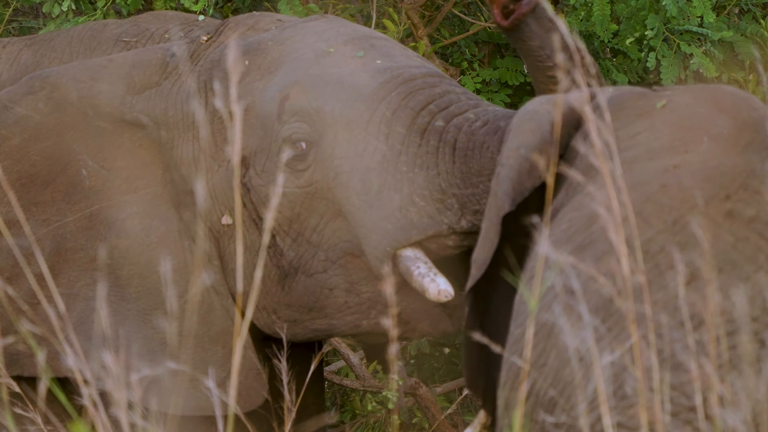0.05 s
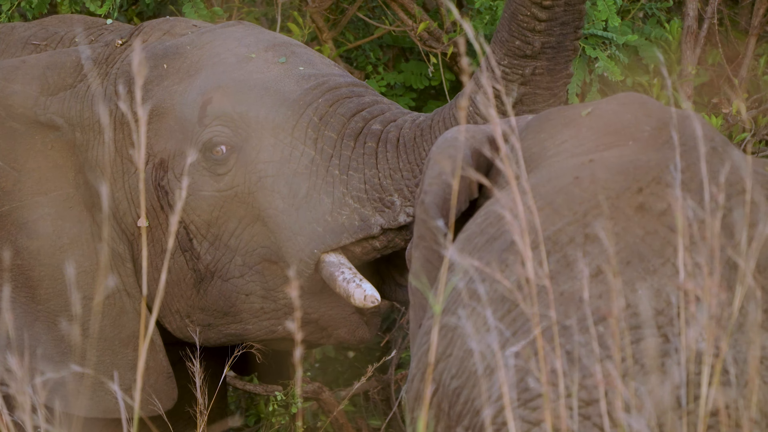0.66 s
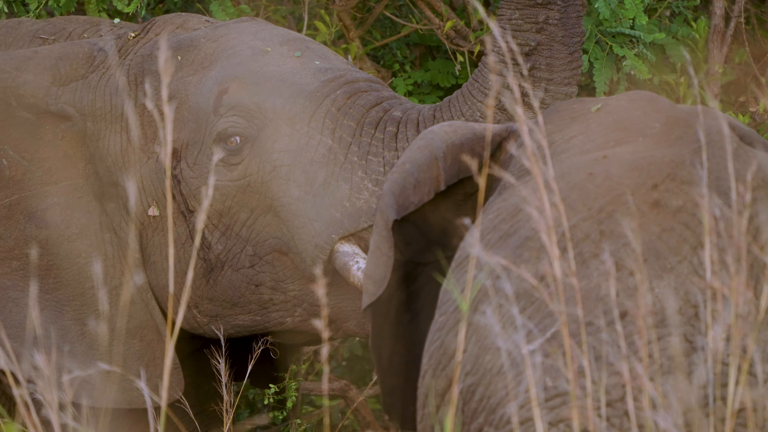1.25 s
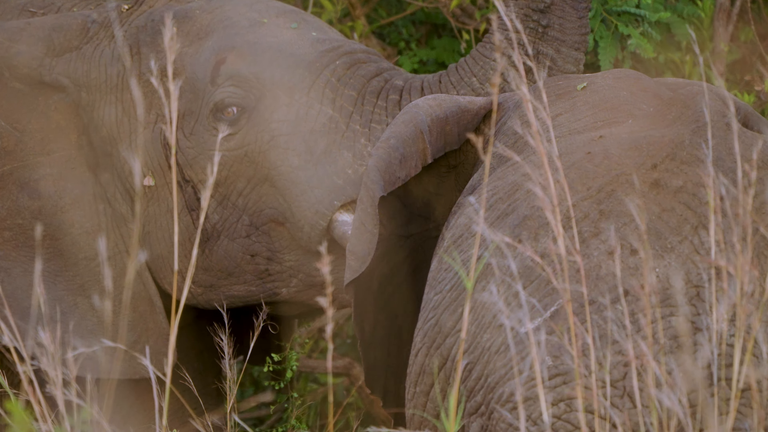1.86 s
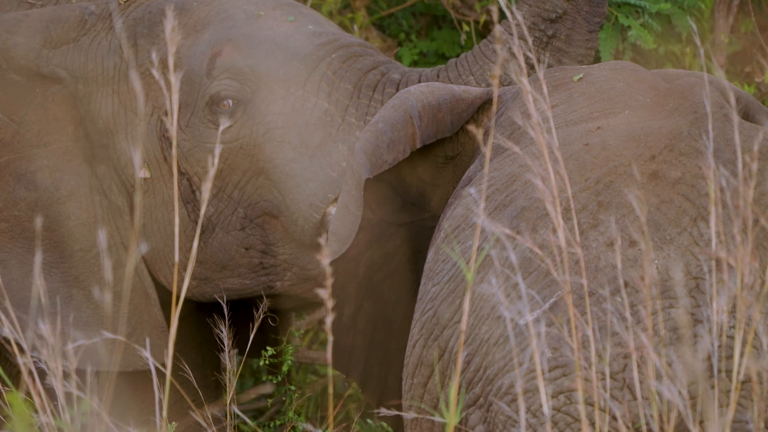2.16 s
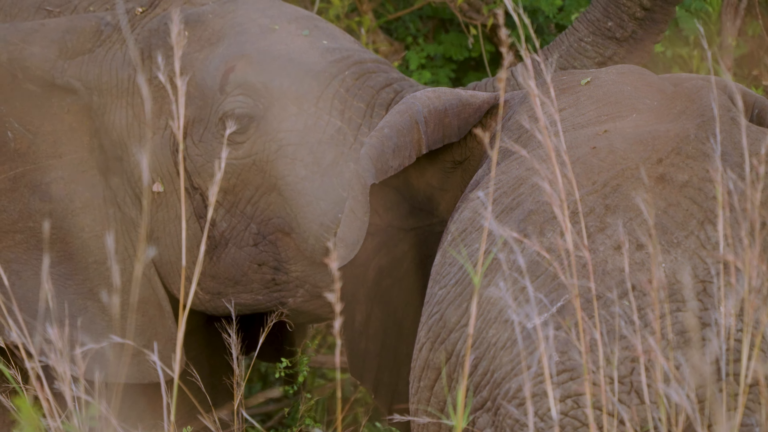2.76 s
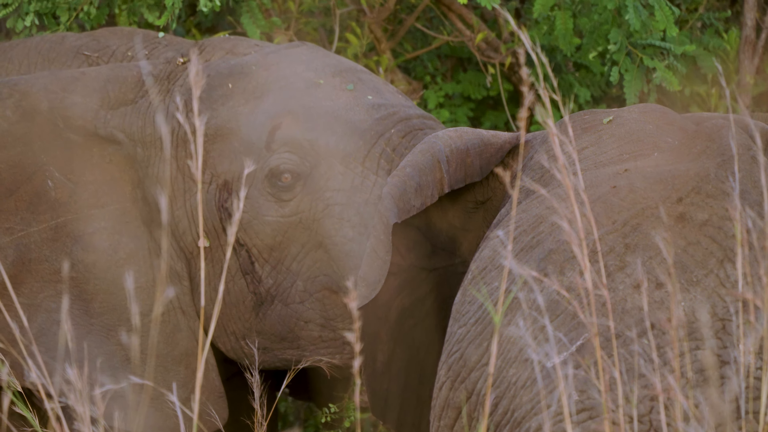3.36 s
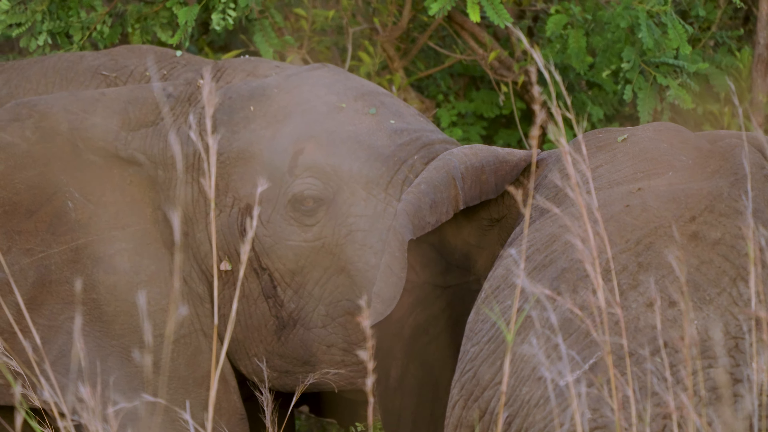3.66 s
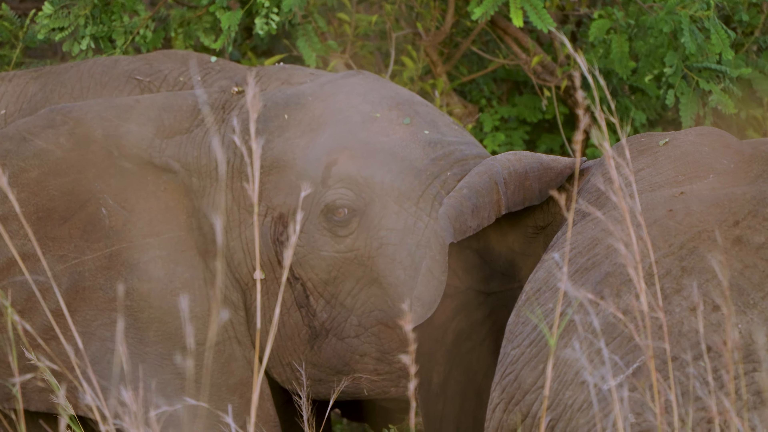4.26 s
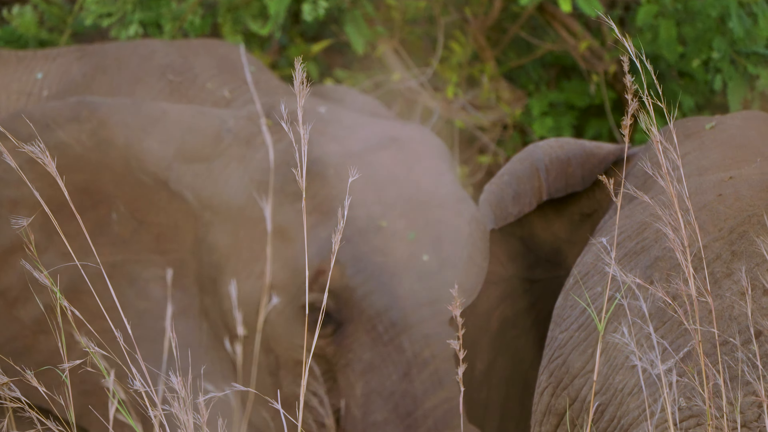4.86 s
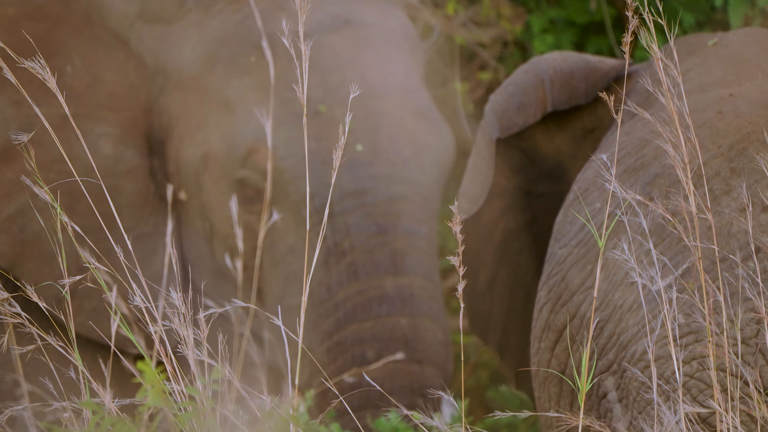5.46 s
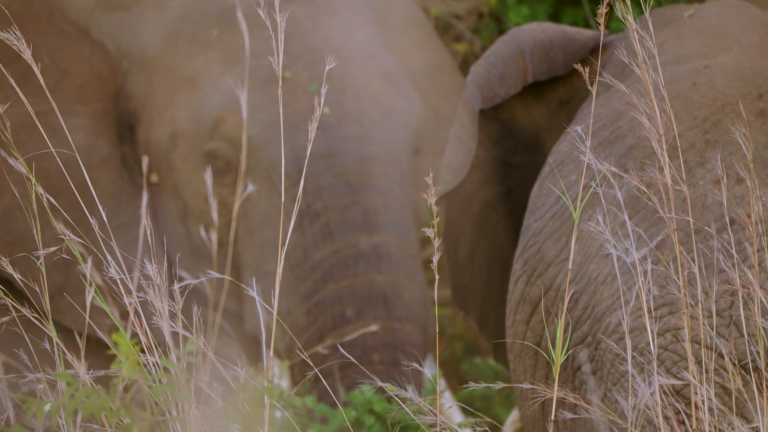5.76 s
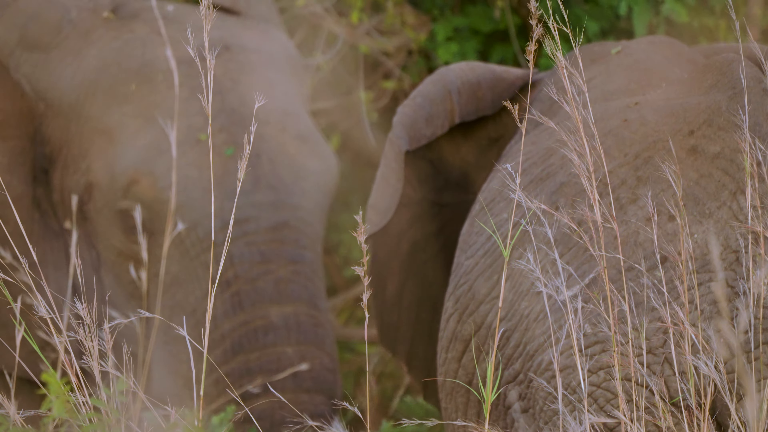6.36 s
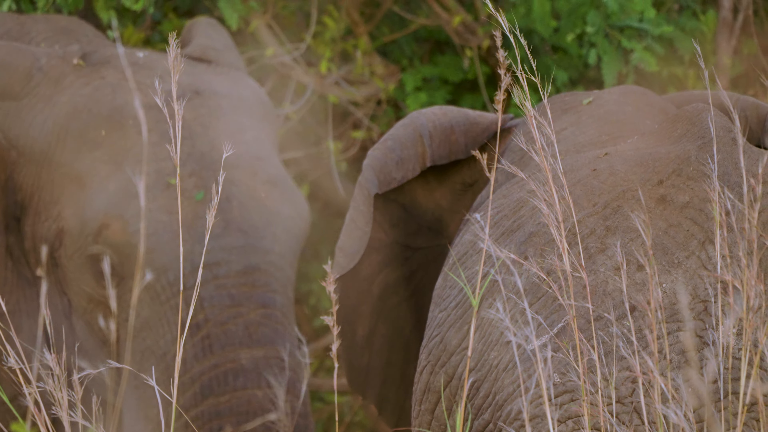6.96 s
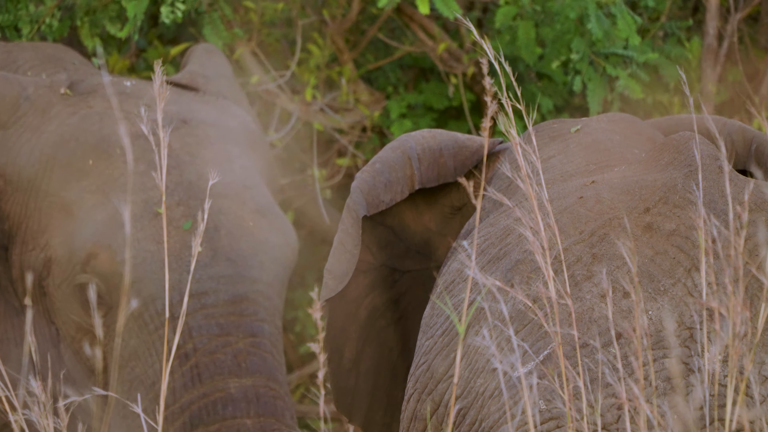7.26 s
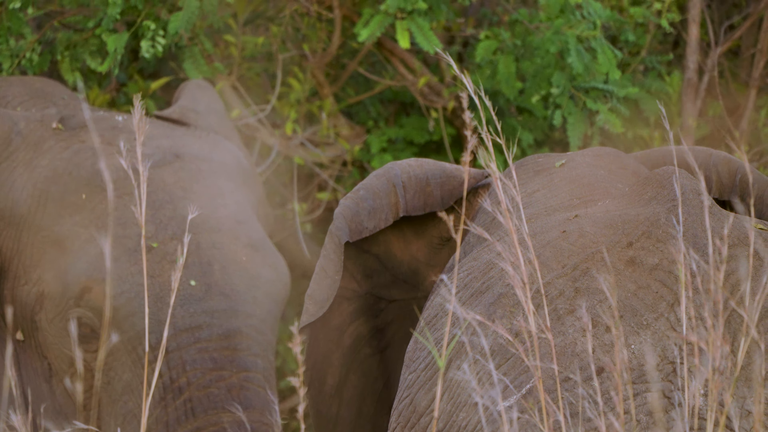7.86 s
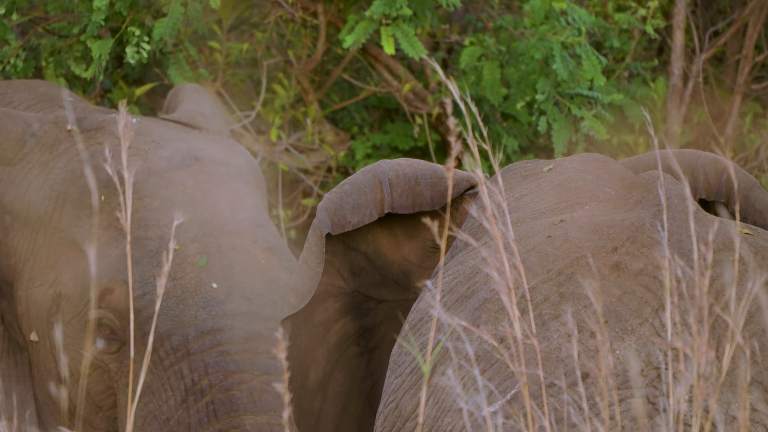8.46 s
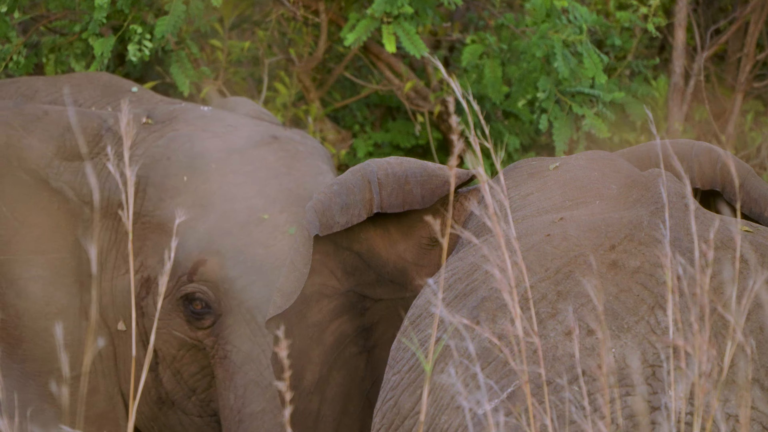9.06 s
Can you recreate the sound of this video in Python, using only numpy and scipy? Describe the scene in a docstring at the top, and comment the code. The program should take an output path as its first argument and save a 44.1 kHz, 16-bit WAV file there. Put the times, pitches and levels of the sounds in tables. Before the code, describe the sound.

Outdoors in the bush, a steady low hum and soft hiss run under faint birdsong. Tall grass rustles lightly and dry stems snap around elephants. A camera control is pressed and released three times in the first half, with sharp ticks and low thumps right at the microphone. A bird chatters, then turns to whistles, joined by two warbles. At the very end an elephant breaks into a loud, harsh roar, cut off almost at once.

```python
"""Tall grass rustles and dry stems snap around elephants, while birds sing in the bush behind them.
A control on a camera is pressed and let go three times, with sharp ticks and low thumps of the casing.
A low hum, probably the camera's own, runs throughout over soft outdoor air and hiss.
At the very end an elephant breaks into a roar: slow, harsh pulses that ring its throat."""
import sys
import numpy as np
from scipy import signal
from scipy.fft import rfft, irfft, next_fast_len
from scipy.io import wavfile
from scipy.ndimage import uniform_filter1d

SR = 44100
rng = np.random.default_rng(int(sys.argv[2]) if len(sys.argv) > 2 else 0)


def to_wav(sig):
    """Store sig (one row per channel, or 1-D mono) as 16-bit WAV at the path in sys.argv[1].

    Samples outside -1..1 are clipped; the rate is SR.
    """
    pcm = np.clip(np.atleast_2d(sig), -1, 1) * 32767
    pcm = np.round(pcm).astype(np.int16)
    wavfile.write(sys.argv[1], SR, pcm.T)  # frames by channels


N = 401751
TIME = np.arange(N) / SR
TOP_HZ = 15800
BUSH_FADE_S = .45  # a "fade" is the time a sound takes to drop by 60 dB

# The pitches the throat rings at (more damping, shorter ring): pitch_hz, damping_hz, level_db
THROAT_RINGS = [(450, 60, -8), (560, 85, -4), (680, 110, -13), (1000, 110, -21), (1350, 55, -32),
                (1770, 65, -30), (3400, 250, -38), (3950, 110, -32)]
# The roar's effort gathers, then surges: time_s, level_db
ROAR_EFFORT = [(9.036, -21.5), (9.099, -12), (9.107, -4.5)]


def elephant(start_s=9.036, rate_hz=62, rise_hz_per_s=223, weak_db=-5, rasp_db=-22, slap_s=.00073):
    """Heavy vocal folds slap open ever faster; each slap rings the throat and air rasps through it."""
    elapsed = np.maximum(TIME - start_s, 0)
    slap_count = np.ceil(rate_hz * elapsed + rise_hz_per_s * elapsed ** 2 / 2)
    effort_db = np.interp(TIME, *np.transpose(ROAR_EFFORT))
    effort = undb(effort_db + weak_db * (slap_count % 2))  # weak and strong by turns
    t = np.arange(SR // 20) / SR
    push = np.sin(np.pi * np.minimum(t / slap_s, 1)) ** 2  # soft flesh gives a rounded push
    slaps = signal.fftconvolve(np.diff(slap_count, prepend=0), push / push.sum())[:N]
    airflow = np.clip((TIME - start_s) / .025 + 1, 0, 1) ** 2  # starts just before the first slap
    rasp = undb(rasp_db) * rng.standard_normal(N) / np.sqrt(SR / 1000) * airflow
    throat = 0
    for hz, damping_hz, db in THROAT_RINGS:
        age = 2 * np.pi * damping_hz * t
        throat = throat + undb(db) * swell(age) * np.sin(2 * np.pi * hz * t)
    voice = signal.fftconvolve((slaps + rasp) * effort, throat)[:N]
    return band(voice, low_hz=324, high_hz=4930, order=4)


# The control goes down and comes up by turns: start_s, tick_db, thump_db, swell_s
PRESSES = [(.3043, -15.5, -30, 0.014), (.5458, -37.5, -30, 0.016), (1.873, -20, -32, 0.019),
           (2.111, -24.5, -29, .019), (4.0865, -19.5, -27, 0.018), (4.284, -57, -26.5, 0.015)]
# The high rings of a tick, levels relative to tick_db: pitch_hz, level_db, fade_s
TICK_RINGS = [(1427, -32.5, 0.1), (1870, -27, 0.02), (2220, -31, 0.026), (3040, -5, 0.0045),
              (4190, -5.5, 0.0074), (4710, -8.5, 0.0035), (6300, -12, 0.0034), (8020, -12.5, 0.0067)]
# The low rings of the casing, levels relative to thump_db: pitch_hz, level_db, fade_s
CASING_RINGS = [(145, -24.5, 0.1), (231, -10.5, 0.15), (314, -43, 0.48), (427, -15.5, 0.083),
                (500, -13.5, 0.063), (620, -5, 0.042), (726, -8.5, 0.035)]


def camera_control(thump_hz=294.3, thump_delay_s=.0069, pitch_sag=.074, rattle_db=-30):
    """Each press or release ticks and knocks the casing, whose low thump quickly swells and dies."""
    out, t = np.zeros(N), np.arange(SR // 6) / SR
    for start_s, tick_db, thump_db, swell_s in PRESSES:
        rattle = undb(rattle_db) * rng.standard_normal(len(t)) * fade(t, fade_s=.13)
        tick = band(ring(TICK_RINGS, t) + rattle, low_hz=1280, high_hz=7400, order=4)
        add(out, start_s, undb(tick_db) * tick)
        soft_start = 1 - np.exp(-t / .0057)
        knock = band(ring(CASING_RINGS, t) * soft_start, low_hz=125, high_hz=940, order=3)
        add(out, start_s, undb(thump_db) * knock)
        age = t / swell_s
        sinking_hz = thump_hz * (1 + pitch_sag * (np.exp(-age) - np.exp(-1)))
        thump = swell(age) ** 2.64 * np.sin(2 * np.pi * np.cumsum(sinking_hz) / SR)
        add(out, start_s + thump_delay_s, undb(thump_db) * thump)
    return out


# The loudest snapping stems: start_s, level_db, centre_hz, octaves_each_side, fade_s
LOUD_SNAPS = [(.153, -42, 9000, .84, 0.1), (0.44, -44, 5300, .9, .022), (.782, -46, 6460, .8, 0.04),
              (1.041, -40, 12500, 0.14, .013), (1.432, -54, 11500, 0.6, .013),
              (4.222, -53.5, 6470, 0.27, 0.016), (5.784, -46, 2620, 0.52, 0.032),
              (6.195, -45, 14000, .4, 0.0058), (6.33, -53.5, 1700, 1, .07),
              (6.545, -48.5, 2260, 0.27, 0.033), (8.779, -53, 1900, 0.87, 0.065)]


def snapping_stems(crackle_db=4):
    """Dry stems snap in short crackling bursts of noise."""
    out, t = np.zeros(N), np.arange(SR // 6) / SR
    for start_s, db, centre_hz, octaves, fade_s in LOUD_SNAPS + faint_snaps():
        fibres = unit(rng.standard_normal(len(t)) * undb(crackle_db * rng.standard_normal(len(t))))
        low_hz, high_hz = centre_hz / 2 ** octaves, min(centre_hz * 2 ** octaves, TOP_HZ)
        burst = band(fibres * fade(t, fade_s), low_hz, high_hz, order=2)
        boost = np.sqrt(SR / 2 / (high_hz - low_hz))  # makes up for what the filter takes away
        add(out, start_s, undb(db) * burst * boost)
    return out


def faint_snaps(count=14, level_db=-58.5, low_hz=1200, high_hz=9000, octaves=.6, fade_s=.038):
    """Rows of faint snaps at random times, from thick stalks (low) to thin blades (high)."""
    when, pitch = rng.random((count, 2)).T
    starts_s = (np.arange(count) + when) / count * N / SR
    centres_hz = low_hz * (high_hz / low_hz) ** pitch
    return [(start_s, level_db, hz, octaves, fade_s) for start_s, hz in zip(starts_s, centres_hz)]


# Grass brushes past the animals in strokes that swell, hold and die away: peak_s, hold_s, level_db
BRUSH_STROKES = [(0, 0.031, -60), (0.31, 0.11, -61.5), (0.71, 0.42, -60.5), (1.374, 0.024, -68.5),
                 (2.01, 0.17, -67.5), (3.61, 0.041, -66.5), (6.814, .07, -69)]
# The tone of the rustle: pitch_hz, relative_level_db
RUSTLE_TONE = [(100, -48), (1000, -7.5), (2500, 4.5), (4000, 1), (7500, 3), (11500, -1), (13000, -2.5),
               (16000, -6)]


def rustling_grass(rest_db=-74.5, rise_s=.21, fall_s=.05, catches_per_s=70, crackle_db=-4.5):
    """Brushed blades give a dense, grainy rustle; some catch and let go with a crackle."""
    contact = undb(rest_db)  # the grass is never quite still
    for peak_s, hold_s, db in BRUSH_STROKES:
        before, after = np.maximum(peak_s - TIME, 0), np.maximum(TIME - peak_s - hold_s, 0)
        contact = np.maximum(contact, undb(db) * np.exp(-before / rise_s - after / fall_s))
    t = np.arange(SR // 6) / SR
    catches = (rng.random(N) < catches_per_s / SR) * rng.random(N)
    bursts = signal.fftconvolve(catches, fade(t, fade_s=.008))[:N]
    crackles = unit(band(bursts * rng.standard_normal(N), low_hz=1500, high_hz=8000, order=1))
    rustle = shaped_noise(RUSTLE_TONE, grain_db=2)
    swish = undb(1.83 * wander(rate_hz=25))
    return (rustle + undb(crackle_db) * crackles) * contact * swish


# One chatter, levels relative to its row in CHATTERS:
# delay_s, length_s, first_hz, last_hz, level_db, octave_db
CHATTER_NOTES = [(0, 0.0236, 3250, 3450, -8, -20), (0.086, 0.021, 2746, 2636, -2, -20),
                 (0.136, .025, 2802, 2586, -5, -22), (0.283, 0.039, 2820, 2666, -2.5, -13),
                 (0.351, 0.0408, 2730, 2410, -1.5, -18), (0.486, 0.014, 3330, 3500, -10, -20),
                 (0.498, 0.023, 2660, 2700, -6.5, -15), (0.532, 0.023, 2795, 2596, 2, -17.5)]
# Each time it is sung: start_s, level_db, spacing_factor, held_note_db, held_octave_db
CHATTERS = [(-.468, -55, 0.98, -60, -12), (0.286, -54.5, 0.97, -57.5, -13), (0.999, -55, 1.01, -63.5, -8),
            (1.744, -55, 0.99, -65, -6), (2.496, -56.5, 1.005, -57.5, -8), (3.269, -57.5, 1.05, -60.5, -4),
            (4.077, -52.5, 1.12, -61.5, -11)]


def chattering_bird(stop_s=4.35):
    """The nearest bird chatters over and over, opening each time with a held note, then breaks off."""
    out = np.zeros(N)
    for start_s, db, spacing, held_db, held_octave_db in CHATTERS:
        held = note(length_s=.093, first_hz=3038, last_hz=3004, db=held_db, octave_db=held_octave_db)
        add(out, start_s + .022, held)
        for delay_s, length_s, first_hz, last_hz, note_db, octave_db in CHATTER_NOTES:
            note_s = start_s + spacing * delay_s
            if note_s < stop_s:
                add(out, note_s, note(length_s, first_hz, last_hz, db + note_db, octave_db))
    return out


# A high whistle and a falling "chew", levels relative to their rows in WHISTLES and CHEWS:
# delay_s, length_s, first_hz, last_hz, level_db, octave_db
WHISTLE_NOTES = [(0, 0.03, 3370, 3400, -16, -25), (.02, 0.087, 3285, 3210, 0.5, -12),
                 (.153, .038, 3250, 3040, -3.5, -23)]
CHEW_NOTES = [(-.11, 0.06, 2955, 2800, -9, -25), (0, .036, 2780, 2574, 2.5, -29)]
# Each time they are sung: start_s, level_db
WHISTLES = [(4.531, -68.5), (5.179, -62.5), (5.883, -66), (6.579, -65.5), (7.3, -62), (8.125, -59.5),
            (8.85, -60.5)]
CHEWS = [(5.618, -66.5), (6.332, -63), (7.151, -63), (8.465, -60.5)]


def whistling_bird():
    """The same bird goes on to whistle at the same pace, sometimes with a short "chew" in between."""
    out = np.zeros(N)
    for phrase, repeats in (WHISTLE_NOTES, WHISTLES), (CHEW_NOTES, CHEWS):
        for start_s, db in repeats:
            for delay_s, length_s, first_hz, last_hz, note_db, octave_db in phrase:
                add(out, start_s + delay_s, note(length_s, first_hz, last_hz, db + note_db, octave_db))
    return out


# Single notes of other birds: start_s, length_s, first_hz, last_hz, level_db
SINGLE_NOTES = [(2.442, .049, 2670, 2706, -58), (2.772, .054, 1990, 1840, -65),
                (5.246, .078, 1813, 1747, -64), (6.617, .08, 3730, 3630, -73),
                (6.858, 0.084, 3710, 3656, -68.5), (7.556, 0.065, 2730, 2710, -59),
                (8.579, .064, 2550, 2820, -66), (8.636, 0.048, 2920, 3190, -60),
                (8.793, 0.027, 3200, 2944, -58.5)]
# A warble, two peaks and a long slide down: time_s, pitch_hz, relative_level_db
WARBLE_SHAPE = [(0, 2000, -20), (.029, 2720, -7), (.055, 2380, -1), (.073, 2620, -18), (0.093, 2843, -1),
                (.126, 2700, -14), (.15, 2380, -4.5), (.172, 2130, -11.5), (.207, 2046, 3),
                (.243, 1880, -28)]
# Each time it is sung: start_s, level_db, length_factor, pitch_factor
WARBLES = [(7.2, -51, 1, 1.008), (7.684, -55.5, 1.03, .985)]


def other_birds():
    """Other birds drop in single notes and two warbles."""
    out = np.zeros(N)
    for start_s, length_s, first_hz, last_hz, db in SINGLE_NOTES:
        add(out, start_s, note(length_s, first_hz, last_hz, db, octave_db=-28))
    shape_s, shape_hz, shape_db = np.transpose(WARBLE_SHAPE)
    for start_s, db, length_factor, pitch_factor in WARBLES:
        t = np.arange(0, shape_s[-1], 1 / (SR * length_factor))
        hz = pitch_factor * np.interp(t, shape_s, shape_hz)
        gain = undb(db + np.interp(t, shape_s, shape_db))
        add(out, start_s, bird_tone(hz, gain, octave_db=-32))
    return out


def note(length_s, first_hz, last_hz, db, octave_db, bend=1.265):
    """One bird note that swells and fades while its pitch bends ever faster."""
    progress = np.linspace(0, 1, int(length_s * SR))
    hz = first_hz + (last_hz - first_hz) * progress ** bend
    arch = np.abs(np.sin(np.pi * progress)) ** .34
    return bird_tone(hz, undb(db) * arch, octave_db)


def bird_tone(hz, gain, octave_db, pitch_waver=.004, flutter_db=1.3):
    """A bird's nearly pure tone with a weaker one an octave up; pitch and strength tremble."""
    tremble = unit(uniform_filter1d(rng.standard_normal(len(hz)), size=130))
    flutter = unit(uniform_filter1d(rng.standard_normal(len(hz)), size=130))
    phase = 2 * np.pi * np.cumsum(hz * (1 + pitch_waver * tremble)) / SR
    tone = np.sin(phase) + undb(octave_db) * np.sin(2 * phase)
    return np.sqrt(2) * gain * undb(flutter_db * flutter) * tone


def birds_in_bush():
    """The leaves dull and scatter all the birdsong."""
    song = chattering_bird() + whistling_bird() + other_birds()
    return tree_echo(band(song, low_hz=1050, high_hz=6150, order=12), echo_db=-8)


# The two pitches of the hum: pitch_hz, rough_width_hz, level_db
HUM_BANDS = [(274.7, 18.3, -63), (305.7, 22.4, -57)]
# The tone of the low outdoor air and of the hiss: pitch_hz, relative_level_db
AIR_TONE = [(25, -52.5), (70, -55), (110, -26.5), (160, -21.5), (215, -10), (290, 6), (375, -21.5),
            (450, -6.5), (520, -6.5), (590, 0), (720, -5.5), (950, -10.5), (1300, -13.5), (1800, -33.5)]
HISS_TONE = [(900, -21), (1500, 2.5), (2200, 0), (3500, -1.5), (5000, -0.5), (6200, -4.5), (7800, -7),
             (8600, -10.5), (9400, -0.5), (11000, -5.5), (12800, -7.5), (13500, -3), (15800, -7.5)]
# Faint tones of the electronics: pitch_hz, level_db
WHINE_TONES = [(6750, -87), (7125, -85), (13500, -91), (13875, -88), (14250, -85), (14625, -90)]


def background(air_db=-62, sway_db=.4, hiss_db=-67):
    """Noise ringing in two narrow bands makes a wavering hum, over soft air, hiss and a thin whine."""
    hum = 0
    for hz, width_hz, db in HUM_BANDS:
        peak = signal.iirpeak(hz, hz / (1.22 * width_hz), fs=SR)
        ringing = signal.lfilter(*peak, rng.standard_normal(N))
        hum = hum + undb(db) * unit(signal.lfilter(*peak, ringing))  # a second pass narrows it
    air = shaped_noise(AIR_TONE) * undb(air_db + sway_db * wander(rate_hz=2.71))
    hiss = undb(hiss_db) * shaped_noise(HISS_TONE)
    whine = sum(np.sqrt(2) * undb(db) * np.sin(2 * np.pi * hz * TIME) for hz, db in WHINE_TONES)
    return hum + air + hiss + whine


def tree_echo(x, echo_db):
    """Trees scatter a thin tail of echoes behind the direct sound."""
    t = np.arange(SR // 2) / SR
    tail = rng.standard_normal(len(t)) * fade(t, BUSH_FADE_S) * (t > .008)
    return x + undb(echo_db) * signal.fftconvolve(x, tail / np.linalg.norm(tail))[:N]


def ring(rings, t):
    """Tones that die away after one blow, each slightly off its pitch."""
    detunes = 1 + .015 * rng.standard_normal(len(rings))
    return sum(undb(db) * fade(t, fade_s) * np.sin(2 * np.pi * hz * detune * t)
               for (hz, db, fade_s), detune in zip(rings, detunes))


def shaped_noise(tone, grain_db=0):
    """Noise of strength 1 shaped by (pitch_hz, level_db) points; grain_db makes its level flicker."""
    hz, db = np.transpose(tone)
    size = next_fast_len(N)
    all_hz = np.maximum(np.fft.rfftfreq(size, 1 / SR), 1)
    gains = undb(np.interp(np.log(all_hz), np.log(hz), db))
    noise = rng.standard_normal(N) * undb(grain_db * wander(rate_hz=400))
    return unit(irfft(rfft(noise, size) * gains, size)[:N])


def wander(rate_hz):
    """A random curve of strength 1 that heads for a new value rate_hz times a second."""
    step = int(SR / rate_hz)
    stairs = np.repeat(rng.standard_normal(N // step + 1), step)
    return unit(uniform_filter1d(stairs, step)[:N])


def swell(age):
    """Rise from 0 to a peak of 1 at age 1, then die away."""
    return age * np.exp(1 - age)


def fade(t, fade_s):
    """Start at 1 and drop by 60 dB every fade_s."""
    return np.exp(-np.log(1000) * t / fade_s)


def band(x, low_hz, high_hz, order):
    """Keep what lies between two pitches; a higher order cuts more sharply."""
    edges_hz = [low_hz, min(high_hz, SR / 2 - 1)]
    return signal.sosfilt(signal.butter(order, edges_hz, "band", fs=SR, output="sos"), x)


def undb(db):
    """Turn decibels into a number to multiply by."""
    return 10 ** (np.asarray(db) / 20)


def unit(x):
    """The same sound at an average strength (rms) of 1."""
    return x / np.sqrt(np.mean(x ** 2) + 1e-20)


def add(out, start_s, x):
    """Mix x into out at start_s; skip it if it starts outside the scene."""
    i = int(round(start_s * SR))
    if 0 <= i < N:
        out[i:i + len(x)] += x[:N - i]


def scene():
    """All the sources together in one channel."""
    roar = tree_echo(elephant(), echo_db=-6)
    mix = roar + camera_control() + snapping_stems() + rustling_grass() + birds_in_bush() + background()
    return mix[None]


def record(dry):
    """Cut away the highest treble, above TOP_HZ."""
    return signal.sosfilt(signal.ellip(10, .2, 70, TOP_HZ, fs=SR, output="sos"), dry)


dry = scene()
out = record(dry)
to_wav(out)
```